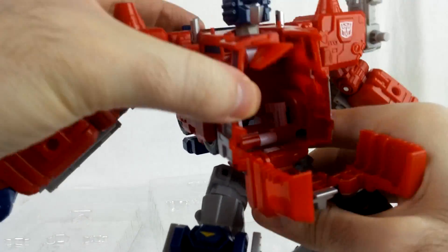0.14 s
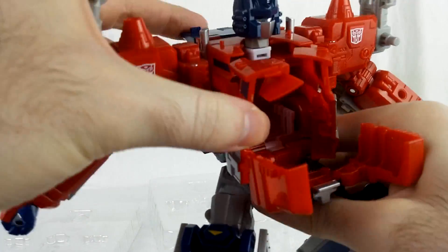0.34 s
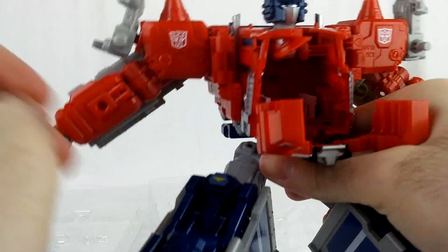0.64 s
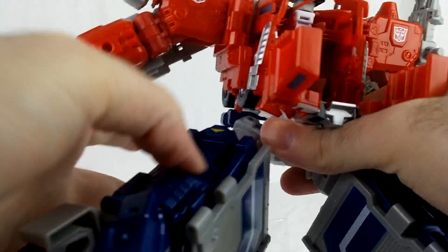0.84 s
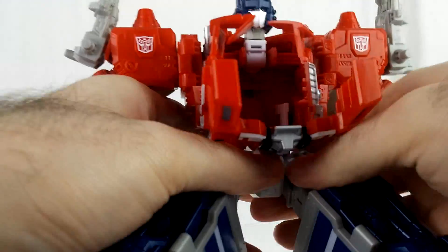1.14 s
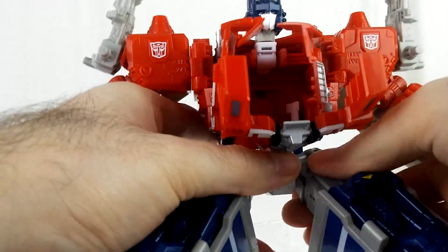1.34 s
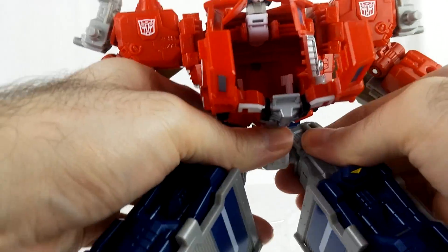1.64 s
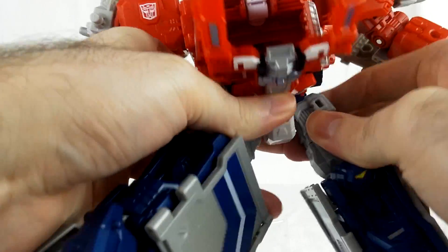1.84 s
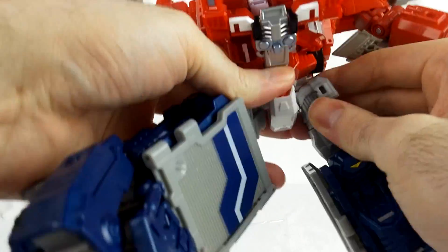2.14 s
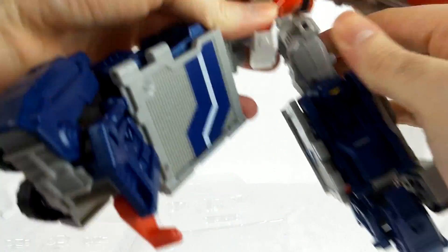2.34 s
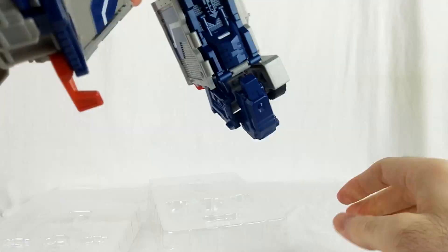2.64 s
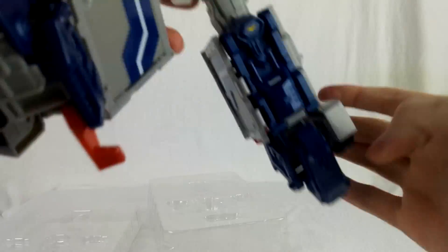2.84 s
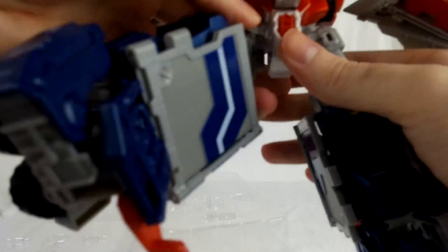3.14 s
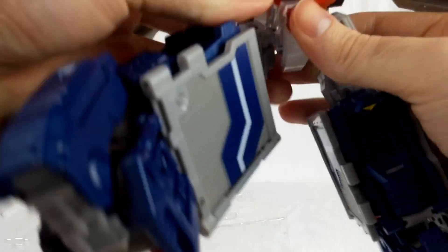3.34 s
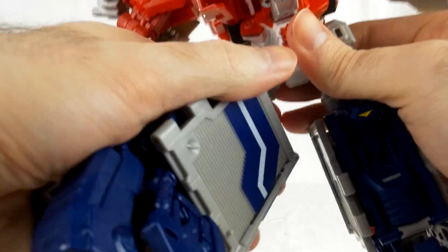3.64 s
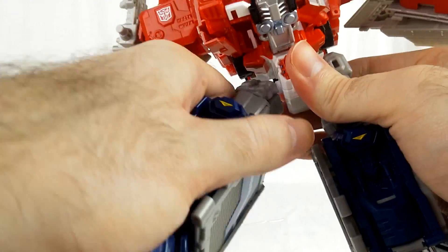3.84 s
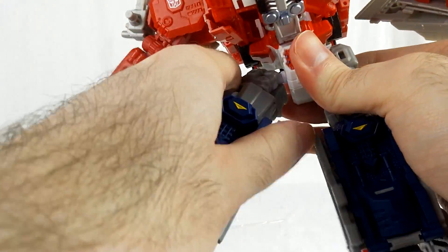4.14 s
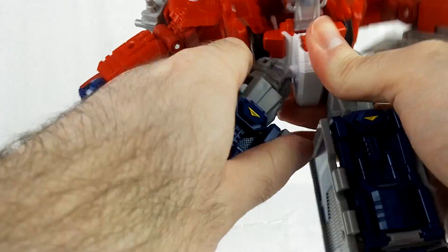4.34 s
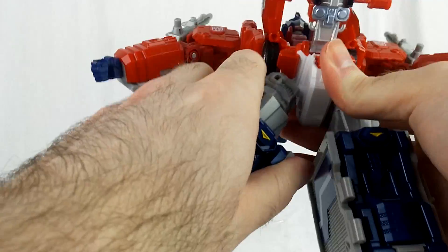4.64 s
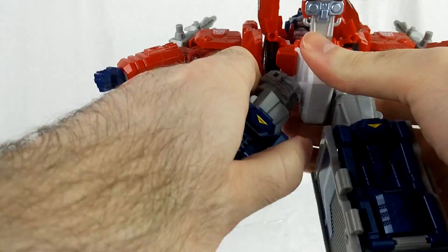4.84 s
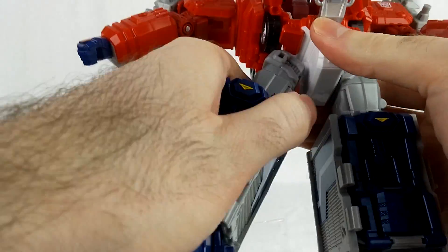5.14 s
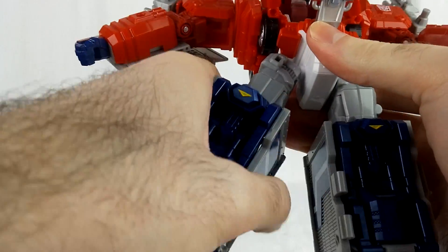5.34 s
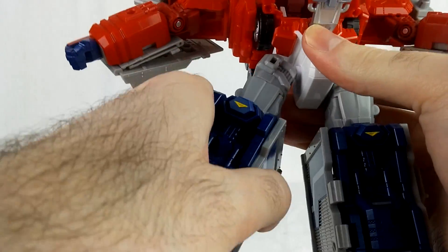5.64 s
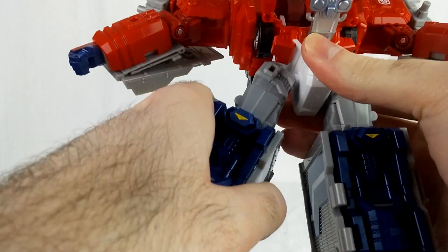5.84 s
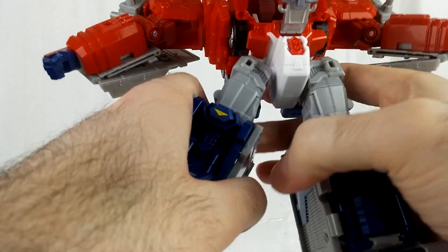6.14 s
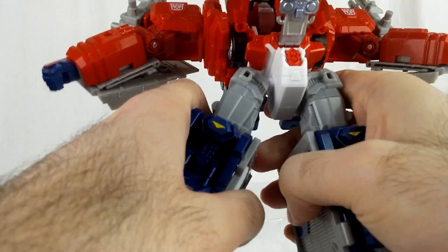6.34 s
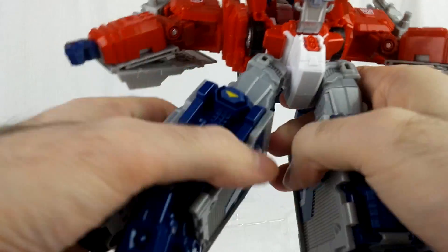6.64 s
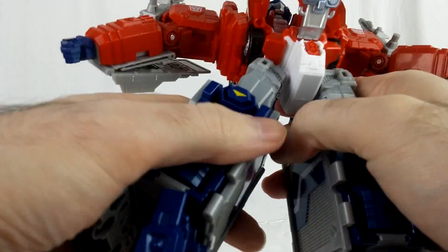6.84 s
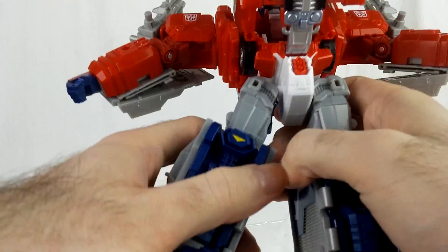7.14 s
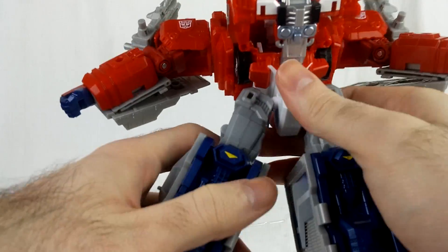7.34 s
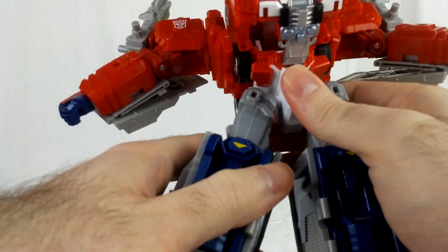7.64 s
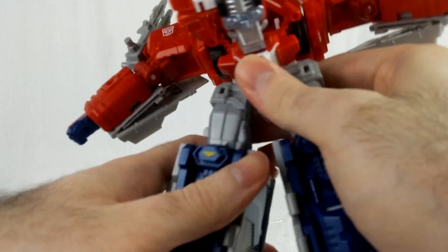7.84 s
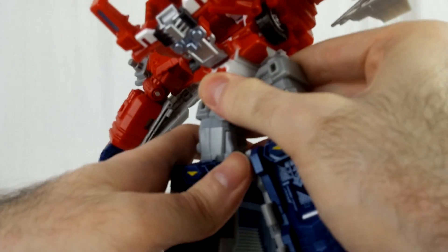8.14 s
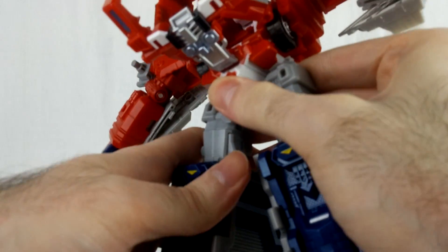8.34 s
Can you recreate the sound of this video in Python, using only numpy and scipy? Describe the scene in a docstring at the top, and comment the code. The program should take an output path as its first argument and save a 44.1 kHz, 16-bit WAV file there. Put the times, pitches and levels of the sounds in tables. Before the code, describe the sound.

Hard plastic joints of a toy figure click, snap and clatter close to the microphone as hands pose it in a small quiet room.

```python
"""Hands pose a hard plastic toy figure close to a microphone in a small quiet room.
It opens with light snaps and ticks over a soft noise bed, which has a breath-like swell before one second;
then ratchet joints snap and loose panels clatter, loudest around two seconds. After a lull come more
clatter, hard snaps past four seconds, then mostly softer ticks. Strokes of rubbing are noise grains that
ring the clicks' modes. Low sine knocks reach the table, the last near the end; a noise gate lowers the
hiss between louder clicks."""
import sys
import numpy as np
from scipy import signal
from scipy.fft import rfft, irfft, next_fast_len
from scipy.io import wavfile

SR = 44100
rng = np.random.default_rng(int(sys.argv[2]) if len(sys.argv) > 2 else 0)


def generate_wav(signal):
    """Clip the signal to [-1, 1] and save it as 16-bit WAV at the path in sys.argv[1]."""
    frames = np.transpose(np.atleast_2d(signal))
    scaled = np.clip(frames, -1, 1) * 32767
    pcm = np.round(scaled).astype(np.int16)
    wavfile.write(sys.argv[1], SR, pcm)


N = 373527  # samples


def from_db(db):
    """Turn decibels into a gain."""
    return 10 ** (np.asarray(db) / 20)


def rms_one(x):
    """Scale to unit rms."""
    return x / np.sqrt(np.mean(x ** 2) + 1e-20)


def at_hz(points, hz):
    """Read a value between (Hz, value) rows, on a log-frequency axis."""
    table = np.array(points)
    return np.interp(np.log(hz), np.log(table[:, 0]), table[:, 1])


def smooth(x, seconds):
    """Running average that forgets the past exponentially."""
    keep = np.exp(-1 / (seconds * SR))
    return signal.lfilter([1 - keep], [1, -keep], x)


def ring(force, hz, t60):
    """A resonance: a unit click sets a sine ringing from height 1, falling 60 dB in t60 seconds."""
    radius = from_db(-60 / (t60 * SR))
    turn = 2 * np.pi * hz / SR
    feedback = [1, -2 * radius * np.cos(turn), radius * radius]
    return signal.lfilter([0, np.sin(turn)], feedback, force + 1e-18, axis=-1)


def energy_as_length(rings, length):
    """Scale each ringing contact so that its energy grows with the length of its chatter."""
    return rings / np.sqrt(np.sum(rings ** 2, axis=1, keepdims=True) / length)


PART_BOOST_DB, PART_WIDTH_OCTAVES = 6.5, 0.092  # the struck part drives modes near its own pitch harder
TREBLE_HZ = 8000  # here the treble setting of a contact applies in full
BELOW_PITCH_DB_PER_OCTAVE = 3  # a part drives little below its own pitch
BELOW_PITCH_FLOOR_DB = -10  # but the shell always answers a little
MODE_LUCK_DB = 1.8  # random spread of each contact's strength in each mode
SIZE_CUT_HZ = 800  # a small body radiates little below this

# The ringing modes of the hollow shell and its panels.
# Each row: pitch in Hz, relative level in dB, time to fall by 60 dB in seconds.
SHELL_MODES = [(550, -15, 0.036), (720, -24, 0.06), (1080, -15, 0.0056), (1360, -13, 0.015),
               (1401, -10.5, 0.036), (1725, 1, 0.0046), (1915, -2, 0.014), (2359, 1.5, 0.005),
               (2905, -5, .008), (3149, -3.5, 0.012), (3466, -1, 0.0098), (4150, -2.5, 0.0033),
               (4655, -4.5, 0.0049), (4717, 1.5, 0.0039), (5380, 2, 0.0043), (5940, 1, 0.0033),
               (6570, 0.5, 0.007), (8070, 3, 0.0019), (8867, -1, 0.011), (9160, 2, 0.0037),
               (10360, -4.5, 0.0081), (10694, -7.5, 0.0087), (12240, -9.5, 0.00057), (14200, -9, 0.0025),
               (15410, -13.5, .002)]


def figure():
    """Contacts and rubbing drive the same modes; every contact finds each mode with its own strength."""
    start_s, contact_db, treble_db, chatter_ms, pitch = contacts().T
    length = np.clip(chatter_ms, .3, 22)[:, None] * SR / 1000  # samples
    swarms = chatter(length)
    rub = rubbing()
    at = np.round(start_s[:, None] * SR).astype(int) + np.arange(swarms.shape[1])

    def place(sounds):
        """Add every contact into the scene at its own time."""
        return np.bincount(at.ravel(), sounds.ravel(), N)

    luck_db = rng.normal(0, MODE_LUCK_DB, (len(start_s), len(SHELL_MODES)))
    # the level is the one heard, however weak the shell is at that pitch
    lift_db = -at_hz(SHELL_MODES, pitch)
    out = place(part_rings(swarms, length, pitch) * from_db(contact_db - 11)[:, None])
    for k, (hz, mode_db, t60) in enumerate(SHELL_MODES):
        octaves = np.log2(hz / pitch)
        towards_treble = np.clip(octaves / np.log2(TREBLE_HZ / pitch), 0, 1)
        colour_db = contact_db + lift_db + towards_treble * (treble_db - lift_db)
        colour_db += np.clip(BELOW_PITCH_DB_PER_OCTAVE * octaves, BELOW_PITCH_FLOOR_DB, 0)
        colour_db += PART_BOOST_DB * np.exp(-(octaves / PART_WIDTH_OCTAVES) ** 2)
        rings = energy_as_length(ring(swarms, hz, t60), length)
        blows = rings * from_db(colour_db + luck_db[:, k] - 11.5)[:, None]
        slide = ring(rub, hz, t60) / np.sqrt(t60 * SR) * from_db(-3.5)
        sign = (-1) ** k  # neighbouring modes move in opposite directions
        out += sign * from_db(mode_db) * (place(blows) + slide)
    high_pass = signal.butter(2, SIZE_CUT_HZ, "high", fs=SR, output="sos")
    return signal.sosfilt(high_pass, out)


HARD_SNAP_DB = -20  # contacts above this set a loose panel clattering
REBOUNDS, REBOUND_GAP_S = 5, 0.021  # count after each hard snap, average spacing
REBOUND_DB, REBOUND_FALL_DB_PER_S, REBOUND_SPREAD_DB = -20.5, 128.5, 4.5  # level against the snap
REBOUND_TREBLE_DB, REBOUND_MS = -6.5, 13
PANEL_LOW_HZ, PANEL_HIGH_HZ = 1600, 3600

# The single plastic contacts.
# Each row: start in seconds, relative level in dB at the struck part's pitch, treble in dB against
# that level, length of the chatter in ms (held to 22 at most), pitch of the struck part in Hz.
PLASTIC_CONTACTS = [(0.027, -28, -3.5, 9.5, 2275), (0.0396, -36, 0, 15, 2050),
                    (0.0586, -26, -11.5, 3.55, 2630), (0.0685, -41, -5, 8.8, 1870),
                    (0.152, -43, -19, 10.0, 2120), (0.3493, -51.5, -25, 11.5, 1360),
                    (0.374, -48, -41, 14.0, 1400), (0.4467, -43, 5, 1.9, 950), (0.8194, -48, -8, 7.8, 1060),
                    (0.9638, -20, -9, 6.6, 5580), (0.9812, -24.5, -25.5, 16, 1690),
                    (0.9979, -20, -15, 5.6, 2013), (1.0215, -47, -21, 10, 2100), (1.04, -42, -7, 11, 1600),
                    (1.0729, -23.5, -10, 6.3, 2144), (1.1106, -50, 3, 13, 1860),
                    (1.173, -36, -24, 4.2, 1490), (1.18, -29.5, -14.5, 13.5, 1730),
                    (1.2187, -47.5, 7.5, 4.3, 1620), (1.3023, -41.5, 1, 7.6, 4160),
                    (1.3983, -42.5, 7, 8.3, 4030), (1.4209, -26.5, -14, 3.5, 2170),
                    (1.435, -28, -13, 2.4, 3370), (1.5007, -42, -23, 11.5, 1580),
                    (1.531, -46.5, -8, 11, 1550), (1.5815, -34.5, -21.5, 7.2, 1800),
                    (1.675, -36, -26, 4.1, 1690), (1.6862, -38, -29, 4.1, 1690),
                    (1.696, -36, -2.5, 3.9, 1790), (1.7297, -40, -16, 6.2, 2310),
                    (1.7473, -28, -33, 5.6, 1760), (1.7559, -4.5, 2.5, 8.4, 4410),
                    (1.7664, -16.5, -3, 10, 3570), (1.8036, -25.5, -5, 6.7, 3670),
                    (1.819, -24, 1.5, 7.4, 3700), (1.855, -40, -7, 5.7, 5870), (1.8718, -21.5, -1, 4, 1210),
                    (1.875, -9.5, 1, 5.6, 3670), (1.8893, -14, 1, 5.2, 2130), (1.908, -20, -24, 7.4, 2330),
                    (1.918, -29, 3, 8.9, 2370), (1.9363, -32, 5, 8.1, 3550), (1.946, -31.5, -4, 7.1, 3460),
                    (2.1, -26, -19, 3.7, 1496), (2.1051, -5.5, 0.5, 4.26, 5600),
                    (2.118, -19, -2, 5.9, 1504), (2.1464, -24.5, -5, 15, 3720), (2.1864, -35, -3, 24, 3670),
                    (2.346, -41, -8.5, 15, 2360), (2.4214, -37, -4.5, 5.9, 1860),
                    (2.4715, -45.5, -8.5, 8.7, 2440), (3.029, -48, -6, 8.4, 2650),
                    (3.0564, -50.5, -0.5, 12.8, 2550), (3.072, -34, -1, 11.3, 2180),
                    (3.094, -39, -8.5, 14, 2440), (3.1129, -32, -1, 11.5, 2360), (3.128, -31, -18, 4, 2360),
                    (3.1591, -25, -9.5, 6.9, 2340), (3.177, -46.5, -5, 4.9, 2330),
                    (3.193, -37.5, -15.5, 16, 2220), (3.247, -47, -14, 8.1, 3470),
                    (3.285, -50, -8, 10, 2160), (3.319, -49, -6.5, 7.6, 1360), (3.35, -43, -6.5, 9.5, 1670),
                    (3.4467, -41, -3.5, 18, 2290), (3.475, -40, -9.5, 8.3, 1720),
                    (3.538, -30, -7, 4.1, 3500), (3.5469, -33, 0, 10.7, 2400), (3.557, -27.5, 2, 9.6, 2330),
                    (3.5791, -28.5, -3, 9.5, 1977), (3.6156, -25, -3, 5, 3690),
                    (3.6299, -30, -35, 9.2, 1590), (3.6434, -34.5, -18, 21, 1685),
                    (3.6838, -23, -6.5, 3.2, 1748), (3.6914, -53, -3, 7.4, 3870),
                    (3.7215, -26.5, -4.5, 4.5, 2047), (3.737, -34, -16, 3.8, 3294),
                    (3.7445, -40.5, -13.5, 4.7, 1675), (3.9179, -40, -14, 5.9, 1693),
                    (3.9374, -36.5, -15, 3.3, 1840), (4.12, -48, -1, 4.5, 3170),
                    (4.1874, -11, -1.5, 10.1, 1797), (4.2212, -27, -8.5, 6.1, 1860),
                    (4.2384, -33.5, -9.5, 8.5, 1780), (4.3313, -16, -14.5, 3.5, 2000),
                    (4.3679, -9, -2, 9.3, 2044), (4.3922, -22.5, -3.5, 15, 1760),
                    (4.527, -42.5, 0, 17, 1240), (4.5362, -7, -1.5, 8.8, 2590),
                    (4.5906, -21, 0.5, 10.5, 1670), (4.609, -34, 1, 7.3, 1540),
                    (4.783, -28, -6.5, 9.7, 2230), (4.8138, -33.5, -3, 18, 2550),
                    (4.828, -16, -3, 5.4, 1706), (4.842, -41, -19, 11.2, 2250),
                    (4.8916, -35.5, 10, 3.3, 6360), (4.9871, -41.5, -17.5, 10.8, 2230),
                    (5.1074, -44, -13.5, 6.2, 1540), (5.2177, -47.5, 3.5, 4.4, 1703),
                    (5.2917, -46.5, -9, 11.6, 1550), (5.362, -37, -10, 7.9, 2440),
                    (5.408, -41, -14, 4.4, 3620), (5.4419, -38, -10, 4.6, 1720),
                    (5.5165, -31.5, -9.5, 7.5, 1920), (5.524, -28.5, -0.5, 4.9, 3020),
                    (5.5497, -18.5, -9.5, 4.4, 1880), (5.571, -26.5, -11.5, 14, 1734),
                    (5.5999, -31, -9.5, 6.7, 2500), (5.61, -31.5, -13, 13.5, 2245),
                    (5.7998, -45.5, -5.5, 12, 3330), (6.0203, -39, -8.5, 9, 2460),
                    (6.0887, -40, -10, 6.1, 2550), (6.265, -35.5, -8.5, 6.6, 2380),
                    (6.309, -53.5, -12, 12.5, 936), (6.335, -37, -5, 6.7, 1422),
                    (6.5123, -48, -0.5, 5.8, 3940), (6.5583, -45.5, -5.5, 11.9, 2180),
                    (6.7355, -43.5, -10.5, 8, 2360), (6.815, -29, -8, 3.3, 2245),
                    (6.8583, -37.5, -9, 6.6, 2377), (6.929, -44.5, -12, 4.4, 3060),
                    (7.0224, -43.5, -13.5, 10, 1750), (7.046, -54.5, 4.5, 11.2, 5500),
                    (7.0617, -57.5, 5.5, 7.9, 2380), (7.118, -40.5, 4, 3.3, 6050),
                    (7.209, -46.5, -10.5, 9, 1070), (7.2386, -34, -9.5, 4.8, 3220),
                    (7.2945, -38, -15.5, 4.3, 2285), (7.311, -37.5, -8, 12, 1720),
                    (7.3582, -40, -8, 10, 2260), (7.6755, -47.5, -6.5, 5.5, 2495),
                    (7.7101, -38.5, 2.5, 6.6, 5260), (7.7892, -56, -1.5, 10.6, 1210),
                    (7.8864, -37.5, 4, 7.7, 6470), (7.9318, -39.5, -4, 8.3, 2350),
                    (8.0607, -46.5, 6.5, 4.6, 4090), (8.292, -49.5, -12, 7.7, 1122)]


def contacts():
    """The listed contacts, a run of weaker ones at uneven gaps after each hard snap, and faint ticks."""
    rows = np.array(PLASTIC_CONTACTS, float)
    hard = rows[rows[:, 1] > HARD_SNAP_DB]
    luck = rng.random((len(hard), 3, REBOUNDS))
    delay_s = REBOUND_GAP_S * (np.arange(1, REBOUNDS + 1) + luck[:, 0])
    level_db = hard[:, 1:2] + REBOUND_DB - REBOUND_FALL_DB_PER_S * delay_s
    level_db = level_db + REBOUND_SPREAD_DB * (2 * luck[:, 1] - 1)
    hz = panel_pitch(luck[:, 2])
    rebounds = np.broadcast_arrays(hard[:, :1] + delay_s, level_db, REBOUND_TREBLE_DB, REBOUND_MS, hz)
    return np.vstack([rows, np.reshape(rebounds, (5, -1)).T, faint_ticks()])


def panel_pitch(luck):
    """A random panel pitch, low ones more often than high ones."""
    return PANEL_LOW_HZ * (PANEL_HIGH_HZ / PANEL_LOW_HZ) ** luck ** 2


TICKS = 70  # spread over the scene, one at a random moment in each equal slot
TICK_OVER_BED_DB, TICK_SPREAD_DB, TICK_TREBLE_DB, TICK_MS = 12, 5, -13.5, 2.1

# Level of a soft noise bed, with a breath-like swell before one second; also sets the faint ticks.
# Each row: time in seconds, relative level in dB.
BED_LEVEL = [(0, -56), (.3, -62), (.8, -50.5), (1.5, -64.5), (2.8, -73.5), (3.4, -58.5), (4.0, -72.5),
             (6.2, -66), (8.47, -86)]


def faint_ticks():
    """Faint pings at random moments, their level following that of the soft noise bed."""
    luck = rng.random((TICKS, 3))
    start_s = (np.arange(TICKS) + luck[:, 0]) * (N / SR - .1) / TICKS
    level_db = np.interp(start_s, *np.transpose(BED_LEVEL)) + TICK_OVER_BED_DB
    level_db = level_db + TICK_SPREAD_DB * (2 * luck[:, 1] - 1)
    hz = panel_pitch(luck[:, 2])
    return np.transpose(np.broadcast_arrays(start_s, level_db, TICK_TREBLE_DB, TICK_MS, hz))


FIRST_IMPACT = 5.0  # height of the opening crack against the impacts that follow


def chatter(length):
    """Each contact is a crack and a swarm of tiny uneven impacts that swells briefly and dies away."""
    n = np.arange(round(.06 * SR))
    swell = 1 - np.exp(-n / (0.044 * length))
    fade = from_db(-12.0 * n / length)  # 12 dB down after one chatter length
    impacts = rng.standard_normal((len(length), len(n)))
    uneven = impacts * np.abs(impacts)
    return uneven * swell * fade + FIRST_IMPACT * (n == 0)


PART_RING_DB, PART_RING_T60_S = 3.5, .03
PART_RING_LOSS_DB_PER_OCTAVE = 6  # small high parts ring more faintly


def part_rings(swarms, length, pitch):
    """Each struck part also rings at its own pitch, as a decaying sine set off by every impact."""
    t = np.arange(swarms.shape[1]) / SR
    sines = np.sin(2 * np.pi * pitch[:, None] * t) * from_db(-60 * t / PART_RING_T60_S)
    rings = signal.fftconvolve(swarms, sines, axes=1)[:, :len(t)]
    octaves_up = np.maximum(np.log2(pitch / PANEL_LOW_HZ), 0)
    level_db = PART_RING_DB - PART_RING_LOSS_DB_PER_OCTAVE * octaves_up
    return energy_as_length(rings, length) * from_db(level_db)[:, None]


RUB_GRAINS_PER_S = 960
STROKE_RISE_DB_PER_S, STROKE_FALL_DB_PER_S = 1200, 319.5

# Fingers and parts slide over the shell.
# Each row: start in seconds, length in seconds, relative level in dB.
RUB_STROKES = [(0.09, 0.04, -45.5), (0.852, 0.015, -41.5), (0.97, 0.0033, -27), (0.996, 0.15, -43),
               (1.376, 0.018, -37.5), (2.303, .05, -47.5), (2.4, 0.02, -46), (3.077, 0.017, -34),
               (3.207, .27, -48.5), (3.386, .03, -44), (3.503, .03, -45), (3.539, 0.0086, -32.5),
               (3.59, 0.064, -43), (4.677, 0.11, -49.5), (4.97, .06, -56.5), (5.345, 0.0085, -50),
               (5.624, 0.053, -50), (5.986, 0.04, -45), (6.67, 0.063, -49), (7.199, 0.053, -49.5),
               (7.32, 0.044, -57), (7.891, 0.076, -49)]


def rubbing():
    """Stick and slip: dense uneven grains over noise; strokes rise, hold and fall above the soft bed."""
    t = np.arange(N) / SR
    level_db = np.interp(t, *np.transpose(BED_LEVEL))
    for start_s, length_s, stroke_db in RUB_STROKES:
        rise_db = STROKE_RISE_DB_PER_S * np.maximum(start_s - t, 0)
        fall_db = STROKE_FALL_DB_PER_S * np.maximum(t - start_s - length_s, 0)
        level_db = np.maximum(level_db, stroke_db - rise_db - fall_db)
    sizes = from_db(5.2 * np.minimum(rng.exponential(1, N), 3.5)) * rng.choice([-1, 1], N)
    grains = rms_one(sizes * (rng.random(N) < RUB_GRAINS_PER_S / SR))
    return (grains + rng.standard_normal(N)) * from_db(level_db)


# Soft knocks through the table.
# Each row: start in seconds, level in dB before the soft onset, pitch in Hz, time to fall 60 dB in seconds.
TABLE_KNOCKS = [(1.761, -32, 80, .06), (1.873, -37.5, 90, 0.042), (4.188, -43.5, 80, .05),
                (4.368, -30.5, 60, 0.075), (4.538, -42.5, 70, 0.06), (8.340, -25, 135, 0.064)]


def thuds():
    """A padded blow rings one low mode of the table."""
    out = np.zeros(N + SR)
    t = np.arange(SR // 4) / SR
    for start_s, level_db, hz, t60 in TABLE_KNOCKS:
        at = round(start_s * SR)
        soft_onset = 1 - np.exp(-t / .006)
        decay = from_db(level_db - 60 * t / t60)
        out[at:at + len(t)] += decay * np.sin(2 * np.pi * hz * t) * soft_onset
    return out[:N]


# How long echoes last in the room.
# Each row: frequency in Hz, time to fall by 60 dB in seconds.
ECHO_T60 = [(400, 0.29), (1500, 0.49), (4000, 0.3), (8000, 0.38), (14000, 0.12)]


def room(x):
    """Diffuse echoes: noise that dies band by band, building up over the first reflections."""
    t = np.arange(round(.7 * SR)) / SR
    tail = 0
    edges = 200 * 2 ** np.arange(0, 6.6, .5)  # half-octave bands, in Hz
    for low, high in zip(edges, edges[1:]):
        band_pass = signal.butter(2, [low, high], "band", fs=SR, output="sos")
        band = signal.sosfilt(band_pass, rng.standard_normal(len(t)))
        t60 = at_hz(ECHO_T60, np.sqrt(low * high))
        tail = tail + band * from_db(-60 * t / t60)
    tail = tail * (1 - np.exp(-t / 0.0042))
    return signal.fftconvolve(x, tail / np.sqrt(np.sum(tail ** 2)))[:N]


HISS_DB = -56  # rms, before the gate

# Colour of the room and preamp noise.
# Each row: frequency in Hz, relative level in dB per Hz.
HISS_COLOUR = [(20, -20), (33, -15), (50, 4), (75, 3), (110, -5.5), (250, -2.5), (370, -6), (800, -11),
               (1400, -12), (2300, -15), (6000, -22.5), (11000, -22.5), (16000, -31.5)]
# Faint appliance tones.
# Each row: pitch in Hz, rms level in dB before the gate.
APPLIANCE_TONES = [(120, -67.5), (215, -70.5), (235, -65.5), (312, -71), (436, -68), (690, -72.5)]


def background():
    """Steady coloured hiss, and tones that waver slightly because noise drives narrow resonances."""
    size = next_fast_len(N)
    hz = np.maximum(np.fft.rfftfreq(size, 1 / SR), 1)
    spectrum = rfft(rng.standard_normal(size)) * from_db(at_hz(HISS_COLOUR, hz))
    hiss = rms_one(irfft(spectrum, size)[:N])
    tones = np.zeros(N)
    for tone_hz, tone_db in APPLIANCE_TONES:
        tones += from_db(tone_db) * rms_one(ring(rng.standard_normal(N), tone_hz, 0.2))
    return from_db(HISS_DB) * hiss + tones


MIC_ROLL_HZ, MIC_ROLL_DB = 11100, -15


def top_loss(x):
    """The microphone loses its top octave: a steep shelf passes it weakened."""
    low_pass = signal.butter(6, MIC_ROLL_HZ, fs=SR, output="sos")
    high_pass = signal.butter(6, MIC_ROLL_HZ, "high", fs=SR, output="sos")
    return signal.sosfilt(low_pass, x) - from_db(MIC_ROLL_DB) * signal.sosfilt(high_pass, x)


ROOM_DB = -15  # echo against the direct sound


def scene():
    """Figure close by, its echo in the room, table and background."""
    toy = top_loss(figure())
    echo = from_db(ROOM_DB) * room(toy)
    return (toy + echo + thuds() + background())[None]


GATE_SENSE_S, GATE_SMOOTH_S = 0.0024, 0.0037  # averaging of the meter and of the gain
GATE_THRESHOLD_DB, GATE_DEPTH_DB = -34, 15  # fully open above the threshold; deepest cut
GATE_SLOPE = 25  # dB of cut per dB below the threshold
GATE_FALL_DB_PER_S = 109.5  # how fast the meter falls back
GATE_FOOT_DB, GATE_FOOT_SLOPE = -53, 0.21  # above this the shut gate gives way a little, dB per dB
OVERLOAD = .75  # height at which the input stage rounds off
CUTOFF_HZ = 16600


def record(dry):
    """Noise gate steered by a peak meter that falls back steadily; rounded peaks, steep top cut."""
    level_db = 10 * np.log10(smooth(dry[0] ** 2, GATE_SENSE_S) + 1e-12)
    # tilting the level up, holding its maximum and tilting back gives a steady fall after each peak
    fall_db = GATE_FALL_DB_PER_S * np.arange(N) / SR
    meter_db = np.maximum.accumulate(level_db + fall_db) - fall_db
    gain_db = np.clip(GATE_SLOPE * (meter_db - GATE_THRESHOLD_DB), -GATE_DEPTH_DB, 0)
    foot_db = GATE_FOOT_SLOPE * np.maximum(meter_db - GATE_FOOT_DB, 0) - GATE_DEPTH_DB
    gain_db = np.minimum(np.maximum(gain_db, foot_db), 0)
    gated = dry * smooth(from_db(gain_db), GATE_SMOOTH_S)
    rounded = OVERLOAD * np.tanh(gated / OVERLOAD)
    top_cut = signal.cheby2(14, 80, CUTOFF_HZ, fs=SR, output="sos")
    return signal.sosfilt(top_cut, rounded)


dry = scene()
out = record(dry)
generate_wav(out)
```